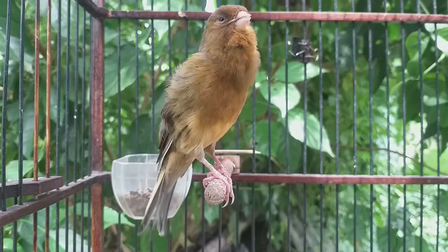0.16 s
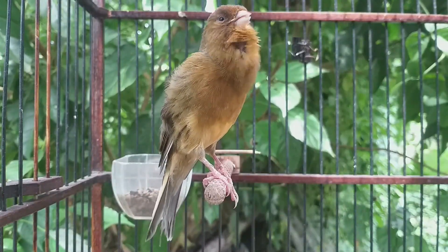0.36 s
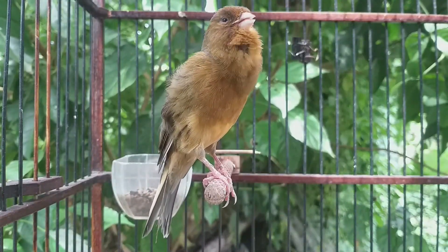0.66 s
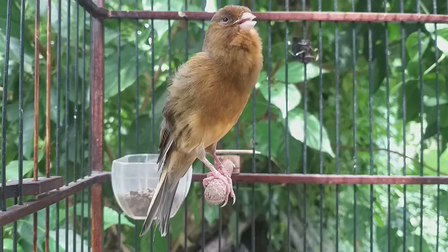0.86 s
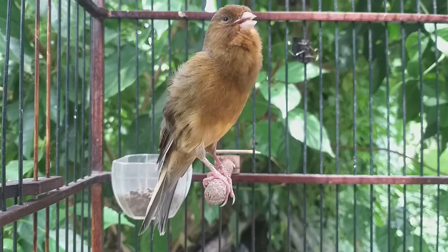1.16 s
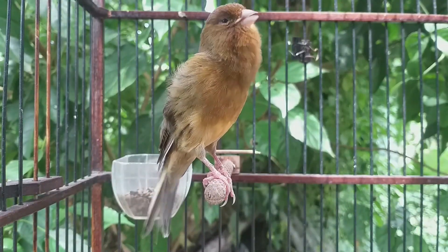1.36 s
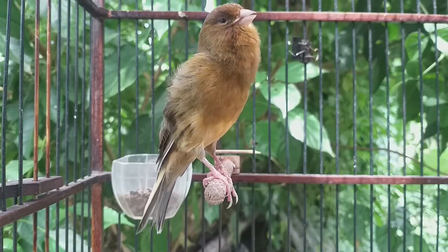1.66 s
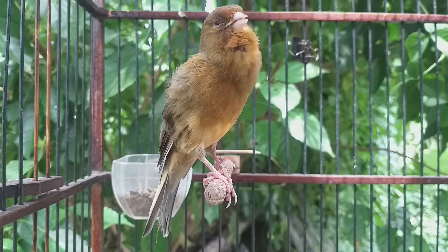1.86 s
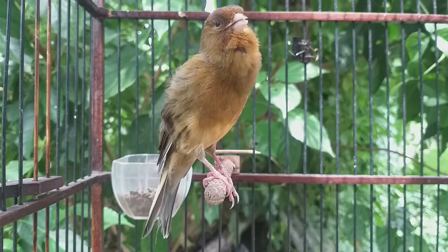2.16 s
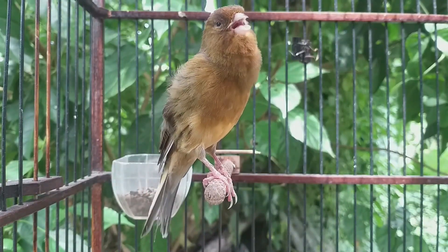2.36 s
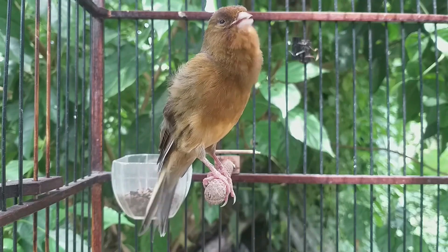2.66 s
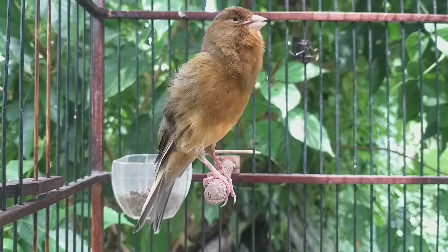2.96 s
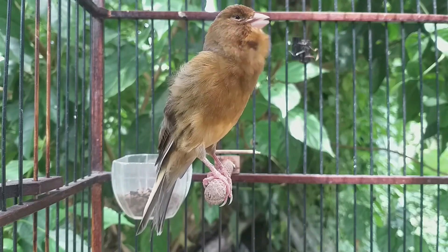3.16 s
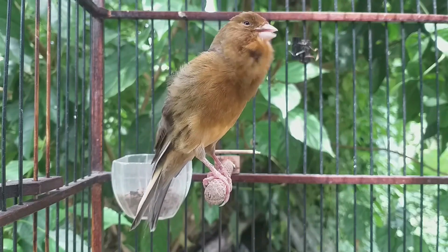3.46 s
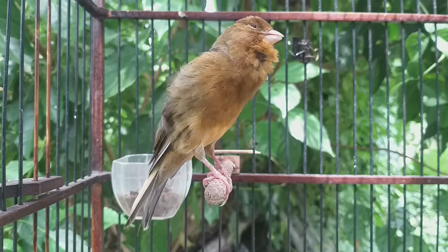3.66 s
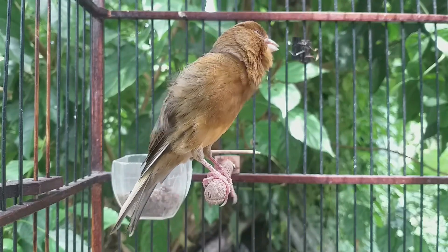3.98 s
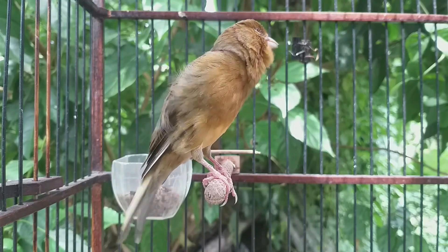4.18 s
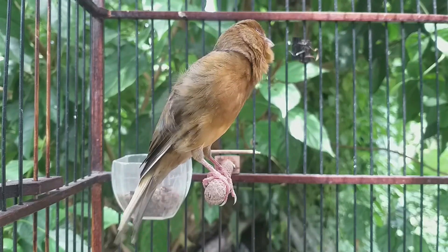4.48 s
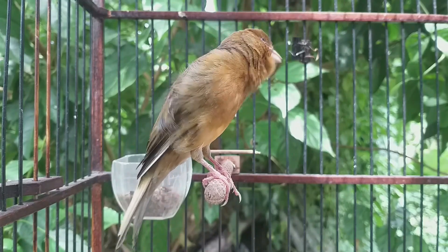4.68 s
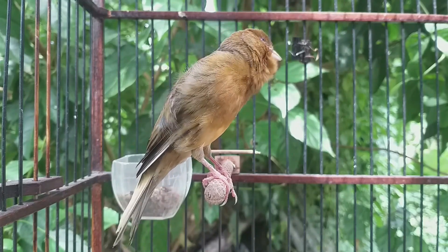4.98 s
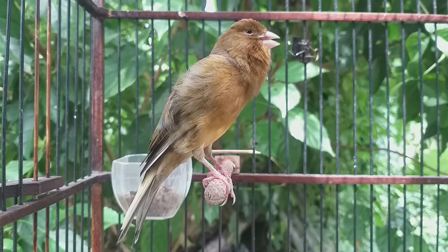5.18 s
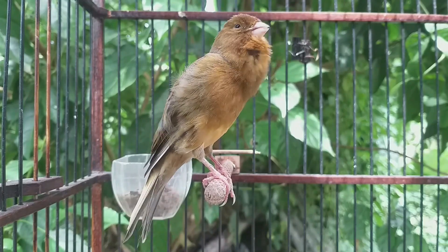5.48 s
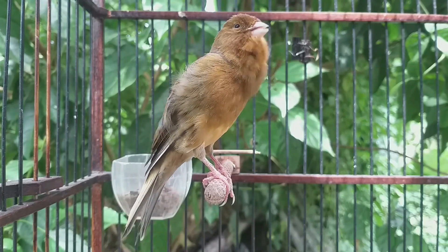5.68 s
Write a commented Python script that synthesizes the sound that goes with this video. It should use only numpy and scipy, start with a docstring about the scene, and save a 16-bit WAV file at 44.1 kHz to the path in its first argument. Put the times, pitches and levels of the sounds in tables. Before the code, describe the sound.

A canary sings loudly in a cage on a garden porch, close to the microphone. It begins with ten clear falling whistles, runs into two fast trills, then seesaws between a low and a high note. Nearby walls add a slight fluttering echo. Behind it, another bird peeps faintly over soft outdoor air, a few light rustles and a low distant rumble.

```python
"""On a garden porch, a canary sings close by in a wire cage: ten long falling whistles, two fast trills,
then a low-high seesaw. Its voice box makes a nearly pure tone, and each phrase repeats a learnt pattern
of pitch and loudness. Nearby walls throw the tone back and make it flutter. Another bird answers faintly
over a low distant rumble, and the loudest notes just overload the recorder."""
import sys
import numpy as np
from scipy import signal
from scipy.fft import rfft, irfft, next_fast_len
from scipy.io import wavfile
from scipy.ndimage import uniform_filter1d, minimum_filter1d

SR = 44100
rng = np.random.default_rng(int(sys.argv[2]) if len(sys.argv) > 2 else 0)


def int16_out(signal):
    """Quantize to a 16-bit WAV file."""
    q = np.round(np.clip(np.atleast_2d(signal).T, -1, 1) * 32767)
    wavfile.write(sys.argv[1], SR, q.astype(np.int16))


N = 257103
TIME = np.arange(N) / SR

# distant rumble and garden air, from low to high: f/Hz, relative level/dB
AIR_SPECTRUM = [(25, -22), (45, -17), (65, -4), (120, -3), (200, -11), (380, -14.5), (520, -23),
                (1000, -34.5), (2000, -36.5), (4000, -28), (6000, -39), (15000, -45)]
# swells of the low drone: peak t/s, half width/s, level/dB
DRONE_SWELLS = [(.96, 0.056, -29.5), (1.28, .06, -28.5), (1.65, 0.069, -31), (2.081, 0.034, -29),
                (2.28, .18, -36.5), (2.821, 0.057, -32.5), (3.419, 0.28, -39), (3.92, .07, -28.5),
                (4.619, 0.074, -33.5), (5.301, 0.036, -28), (5.73, 0.088, -33.5)]
# soft rustles: peak t/s, half width/s, rough f/Hz, level/dB
RUSTLES = [(0.101, 0.035, 980, -45.5), (1.226, 0.071, 915, -54), (1.516, 0.027, 970, -47),
           (2.052, 0.023, 1190, -48.5), (2.198, 0.16, 810, -52.5), (4.104, 0.081, 296, -40),
           (4.419, 0.024, 1010, -43), (4.74, 0.026, 1006, -45)]
# the far bird's calls: start t/s, time stretch, gain/dB, pitch shift/Hz
FAR_PEEPS = [(.24, 1.3, -44, -300), (.474, 0.87, -38, -1), (.499, 0.84, -34, -1000),
             (1.2, 1.34, -29.5, -1200), (1.985, 1, -35.5, 96), (2.044, 1.3, -36, -700),
             (2.41, 1, -43.5, 110), (4.057, 1.37, -31, -900)]
# echoes from cage, floor and walls: delay/s, level/dB
WALL_ECHOES = [(.003014, -22.5), (.004001, -13.5), (.006157, -27), (.009066, -19.5), (.0144, -21),
               (.0178, -26), (.0212, -37.5)]
# overtones, the faint higher tones in a note: multiple of the pitch, relative level/dB
OVERTONES = [(2, -43), (3, -43.5), (4, -36)]
# how well the beak sends out overtones: f/Hz, gain/dB
BEAK_RESPONSE = [(6000, -4), (8500, 9.5), (11000, 4), (12500, 0.5), (14500, -1.5), (16000, -6.5)]

# note shapes, the paths that pitch and loudness follow: t/s before stretching, f/Hz, level/dB
PEEP = [(0, 5230, -23), (.015, 5260, -7), (.035, 4900, -3.5), (.055, 4520, -21.5)]
SNAP = [(0, 5500, -15), (.003, 6250, -13), (.008, 6930, -12)]   # the quick rise that opens every whistle
DEEP_WHISTLE = [(0.025, 7060, -15.5), (0.043, 5890, -11.5), (.066, 5100, -3.5), (.089, 4374, -12),
                (.118, 3646, -12.5), (0.142, 3390, -6.5), (.148, 3252, -1.5), (.190, 3082, -3.5),
                (.231, 3077, -12.5)]
HELD_WHISTLE = [(.023, 7000, -5), (.030, 6904, -10), (.050, 5926, -0.5), (.077, 5268, -5.5),
                (.107, 4463, -6), (.132, 3936, -0.5), (.152, 3724, -0.5), (0.181, 3637, -0.5),
                (.290, 3588, 2)]
LEAD_ARCH = [(0, 5887, -19), (.005, 6880, -32.5), (.015, 6750, -18), (.022, 5040, -12), (.031, 3700, 5.5),
             (.036, 3350, -37), (.045, 2910, -19.5), (.050, 2280, -9)]   # opens the first trill
ARCH = [(0, 3244, -37), (.002, 4295, 2), (.007, 6680, -32), (.012, 6704, -16.5), (.017, 5786, -12),
        (.029, 3890, -1.5), (.036, 3300, -14.5), (.043, 2806, -7), (.048, 2070, -19.5)]   # first trill: up, then down
FLICK = [(-.003, 7030, -27), (.001, 6764, -13), (.005, 6090, -10), (.009, 5510, -20), (.015, 5090, -15.5),
         (.0185, 4583, -3.5), (.0225, 3850, 1.5), (.0255, 3260, -12), (.030, 2950, -34)]   # second trill: straight down
LOW_NOTE = [(0, 3094, -41), (.005, 3390, -15), (.010, 3568, -2), (.018, 3701, 2), (.030, 3663, -5.5),
            (.042, 3650, -8.5), (.056, 3634, -15.5), (.085, 3520, -27.5)]
HIGH_NOTE = [(-.022, 3940, -32.5), (0, 5320, -44.5), (.012, 5945, -30), (.030, 6160, -9),
             (.050, 6178, -4.5), (.064, 6300, -5.5), (.074, 6220, -6.5), (.082, 6114, -13.5),
             (.090, 5707, -31)]

# deep whistles: start t/s, time stretch, gain/dB
DEEP_WHISTLES = [(.001, 0.97, 0.5), (0.2885, 0.99, -1)]
# held whistles: start t/s, time stretch, length/s, glide gain/dB, held gain/dB, end bend/Hz
HELD_WHISTLES = [(0.581, 0.87, 0.23, -3.7, -0.2, 52.5), (0.865, 1, 0.24, -2.5, .7, 31.5),
                 (1.169, .985, 0.24, -4, 0.5, 26), (1.476, 1.034, 0.25, -4.5, 0, -12.5),
                 (1.794, 1.032, 0.26, -2.6, -1, -31), (2.119, 1.057, 0.26, -3.5, -0.3, -11.5),
                 (2.449, 1.022, 0.26, -2.5, -0.4, -34), (2.774, 1.075, 0.26, -3.1, -1.5, -28)]
# the note before the first trill: start t/s, time stretch, gain/dB
LEAD_IN = [(3.116, 0.97, -2.5)]
# seesaw pairs: start t/s, low gain/dB, low shift/Hz, high gain/dB, high shift/Hz
SEESAW_PAIRS = [(4.844, -6, -72, 1.5, 146.5), (5.016, -0.5, 6, 0, 98), (5.187, 1.5, -5, 0, 41),
                (5.359, 1, 5, -1, -7), (5.528, 0, -3, -.5, -18), (5.701, 1.5, -12.5, 1.5, -35.5)]
# the two trills; each note adds slowing_s to the period and lengthening to the time stretch
ARCH_TRILL = dict(count=14, start_s=3.1857, period_s=.0587, slowing_s=.000392,
                  stretch=.96, lengthening=.0069, level_db=.26, ends_db=-2.5)
FLICK_TRILL = dict(count=12, start_s=4.1041, period_s=.0598, slowing_s=.000266,
                   stretch=.81, lengthening=.015, level_db=1.25, ends_db=-2.5)


def from_db(db):
    """Turn decibels into a number to multiply by."""
    return 10 ** (np.asarray(db) / 20)


def rms_one(x):
    """Scale a signal so that its average strength (rms) is one."""
    return x / np.sqrt(np.mean(x ** 2) + 1e-20)


def db_at(spectrum, hz):
    """Look up the level at a frequency, on a scale where all octaves are equally wide."""
    f, db = np.transpose(spectrum)
    return np.interp(np.log(hz + 1e-9), np.log(f), db)


def band_noise(low_hz, high_hz):
    """Hiss between two frequencies, at strength one."""
    sos = signal.butter(2, [low_hz, high_hz], "band", fs=SR, output="sos")
    return rms_one(signal.sosfilt(sos, rng.standard_normal(N + SR))[SR:])


def wander(length, size):
    """A smooth random wiggle that changes over about `size` samples."""
    noise = rng.standard_normal(length + 20 * size)
    slow = uniform_filter1d(uniform_filter1d(noise, size), size)
    return rms_one(slow)[size:size + length]


def bump(peak_s, half_width_s):
    """A smooth rise to one and back to zero."""
    return np.exp(-((TIME - peak_s) / half_width_s) ** 2)


def add(track, start_s, sound):
    """Mix a sound into a track at the given time."""
    i = int(np.clip(round(start_s * SR), 0, N - 1))
    track[i:i + len(sound)] += sound[:N - i]


def garden(air_db=-42.5, drone_hz=84.4, drone_db=-47):
    """Steady air and distant rumble, a low drone that swells now and then, and a few soft rustles."""
    air_gain = from_db(db_at(AIR_SPECTRUM, np.arange(N // 2 + 1) * SR / N))
    air = irfft(rfft(rng.standard_normal(N)) * air_gain, N)
    swell = from_db(drone_db) + sum(from_db(db) * bump(at, width) for at, width, db in DRONE_SWELLS)
    pitch = drone_hz * (1 + .0593 * wander(N, size=2000))
    drone = np.sqrt(2) * np.sin(2 * np.pi * np.cumsum(pitch) / SR)
    out = from_db(air_db) * rms_one(air) + swell * drone
    for at, width, hz, db in RUSTLES:
        out += from_db(db) * bump(at, width) * band_noise(hz / 1.39, hz * 1.11)
    return out


def far_bird():
    """Another bird peeps, faint with distance."""
    return repeat_note(PEEP, FAR_PEEPS)


def scatter(x, level_db, decay_s, delay_s):
    """A blur of tiny echoes that builds up after a delay and fades by 60 dB in decay_s."""
    t = np.arange(SR // 2) / SR
    tail = rng.standard_normal(len(t)) * from_db(-60 * t / decay_s) * np.clip(t / delay_s - 1, 0, 1)
    return from_db(level_db) * signal.fftconvolve(x, tail / np.linalg.norm(tail))[:N]


def porch(x, damping_hz=4400):
    """Wall echoes make gliding notes flutter; clutter rings briefly, the leafy yard longer and duller."""
    walls = sum(from_db(db) * np.interp(TIME - delay, TIME, x, left=0) for delay, db in WALL_ECHOES)
    clutter = scatter(x, level_db=-11.5, decay_s=.14, delay_s=.0018)
    dull = signal.sosfilt(signal.butter(4, damping_hz, fs=SR, output="sos"), x)
    yard = scatter(dull, level_db=-25.5, decay_s=.42, delay_s=.0049)
    return x + walls + clutter + yard


def recording_hiss(notes, treble_db, middle_db):
    loudness = np.sqrt(np.abs(uniform_filter1d(notes ** 2, size=700)))
    treble = band_noise(11400, 15000) + from_db(-6.5) * band_noise(6300, 9000)
    return loudness * (from_db(treble_db) * treble + from_db(middle_db) * band_noise(450, 3400))


def bird_note(shape, stretch, shift_hz=0, bend_hz=0, bright_db=0, waver=.005, shimmer_db=3.5):
    """The voice box sings one tone with faint overtones: rough in fast glides, nearly pure when held."""
    roughest_hz_per_s, wobble, flutter_db = 13000, .002, .89
    times, hz, db = np.transpose(shape)
    t = np.arange(0, (times[-1] - times[0]) * stretch, 1 / SR) / stretch + times[0]
    pitch_drift, level_drift = rms_one(uniform_filter1d(rng.standard_normal((2, len(t))), size=180))
    aim_hz = np.interp(t, times, hz)
    roughness = np.clip(np.abs(np.gradient(aim_hz)) * SR / roughest_hz_per_s, .1, 1)
    unsteady = waver * roughness * pitch_drift + wobble * wander(len(t), size=500)
    pitch = uniform_filter1d(aim_hz * (1 + unsteady), size=70) + shift_hz + bend_hz * t / times[-1]
    phase = 2 * np.pi * np.cumsum(pitch) / SR
    level = uniform_filter1d(np.interp(t, times, db) + shimmer_db * roughness * level_drift, size=50)
    level += flutter_db * wander(len(t), size=400)
    tone = from_db(level) * np.sin(phase)
    for k, overtone_db in OVERTONES:   # these are less steady than the main tone
        flicker_db = 3.5 * wander(len(t), size=200)
        jitter_rad = .38 * wander(len(t), size=50)
        gain = from_db(level + overtone_db + bright_db + db_at(BEAK_RESPONSE, k * pitch) + flicker_db)
        tone += gain * (k * pitch < SR / 2) * np.sin(k * phase + jitter_rad)
    opening = np.clip((t - times[0]) / .001, 0, 1)
    closing = np.clip((times[-1] - t) / min(.006, .07 * times[-1]), 0, 1)
    return tone * opening * np.sin(np.pi / 2 * closing) ** 2


def repeat_note(shape, rows, **voice):
    """Sing one note shape once per row, with that row's pace, strength and any pitch shift."""
    out = np.zeros(N)
    for start, stretch, db, *shift_hz in rows:
        note = bird_note(shape, stretch, *shift_hz, **voice)
        add(out, start + shape[0][0] * stretch, from_db(db) * note)
    return out


def held_whistles(fade_db=-5, release_s=.0077):
    """Each whistle glides down and is held, fading, until the canary closes it off."""
    out = np.zeros(N)
    for start, stretch, length, glide_db, held_db, bend_hz in HELD_WHISTLES:
        tone = bird_note(SNAP + HELD_WHISTLE, stretch, bend_hz=bend_hz, bright_db=3.5)
        t = np.arange(len(tone)) / SR
        effort = from_db(np.interp(t / length, [.4, .7, 1], [glide_db, held_db, held_db + fade_db]))
        add(out, start, tone * effort * np.clip((length - t) / release_s, 0, 1))
    return out


def trill(shape, count, start_s, period_s, slowing_s, stretch, lengthening, level_db, ends_db, **voice):
    """A fast run of notes that slows and lengthens as it goes, and is softer at both ends."""
    k = np.arange(count)
    starts = start_s + period_s * k + slowing_s * k ** 2 / 2
    near_ends = np.linspace(-1, 1, count) ** 4
    rows = np.transpose([starts, stretch + lengthening * k, level_db + ends_db * near_ends])
    return repeat_note(shape, rows, **voice)


def seesaw(leap_after_s=.053, high_stretch=.94, rush_db=-39):
    """Each low note leaps with an airy rush to a high one, which sinks a little from pair to pair."""
    low = [(start, 1, db, hz) for start, db, hz, _, _ in SEESAW_PAIRS]
    high = [(start + leap_after_s, high_stretch, db, hz) for start, _, _, db, hz in SEESAW_PAIRS]
    leaps = sum(bump(start, half_width_s=.04) for start, *_ in high)
    rush = from_db(rush_db) * leaps * band_noise(3400, 6140)
    return repeat_note(LOW_NOTE, low, bright_db=.5) + repeat_note(HIGH_NOTE, high, bright_db=10.5) + rush


def scene():
    """The canary straight ahead, with the other bird and the garden behind it, in stereo."""
    whistles = repeat_note(SNAP + DEEP_WHISTLE, DEEP_WHISTLES, bright_db=1, waver=.0071)
    whistles += held_whistles()
    arches = repeat_note(LEAD_ARCH, LEAD_IN, bright_db=3, shimmer_db=2.7)
    arches += trill(ARCH, **ARCH_TRILL, bright_db=3.5, waver=.006, shimmer_db=2)
    flicks = trill(FLICK, **FLICK_TRILL, bright_db=3.5, shimmer_db=2)
    pairs = seesaw()
    song = whistles + arches + flicks + pairs
    mid = porch(song + far_bird()) + garden()
    mid += recording_hiss(whistles + pairs, treble_db=-50, middle_db=-63.5)
    mid += recording_hiss(arches, treble_db=-31.5, middle_db=-47.5)
    mid += recording_hiss(flicks, treble_db=-36.5, middle_db=-50)
    side = scatter(song, level_db=-26.5, decay_s=.05, delay_s=.0011)   # clutter adds a little width
    return np.array([mid + side, mid - side])


def limiter(x, ceiling=1.046):
    """Turn the loudest peaks down for a millisecond or two, and clip what still sticks out."""
    needed = np.minimum(1, ceiling / (np.abs(x).max(axis=0) + 1e-9))
    gain = uniform_filter1d(minimum_filter1d(needed, size=50), size=70)
    return np.clip(x * gain, -1, 1)


def record(dry, shift_hz=3900, below_db=-30, above_db=-35, far_below_db=-44, cutoff_hz=15700):
    """Limit the peaks, add faint shifted copies of each tone as rate conversion does, and cut the top."""
    limited = limiter(dry)
    treble = signal.lfilter([1, -2, 1], [1], limited)   # higher tones leave stronger copies
    shiftable = signal.hilbert(treble, next_fast_len(N))[:, :N]
    shift = np.exp(2j * np.pi * shift_hz * TIME)   # multiply to move a tone up, divide to move it down
    shifts = from_db(below_db) / shift + from_db(above_db) * shift + from_db(far_below_db) / shift ** 2
    copies = np.real(shiftable * shifts)
    return signal.sosfilt(signal.ellip(10, .1, 80, cutoff_hz, fs=SR, output="sos"), limited + copies)


dry = scene()
out = record(dry)
int16_out(out)
```